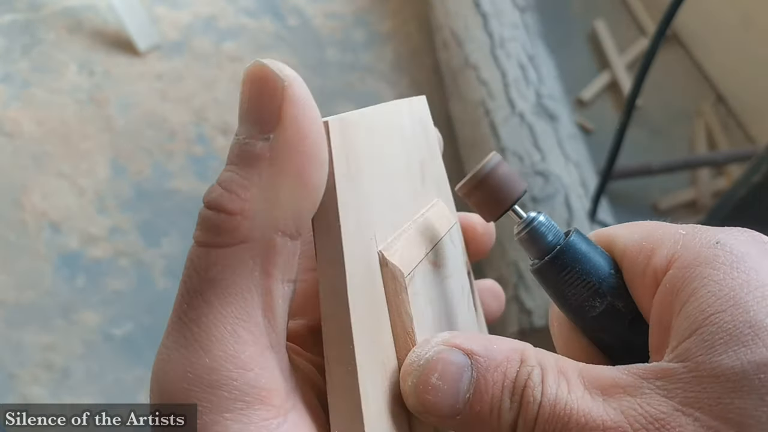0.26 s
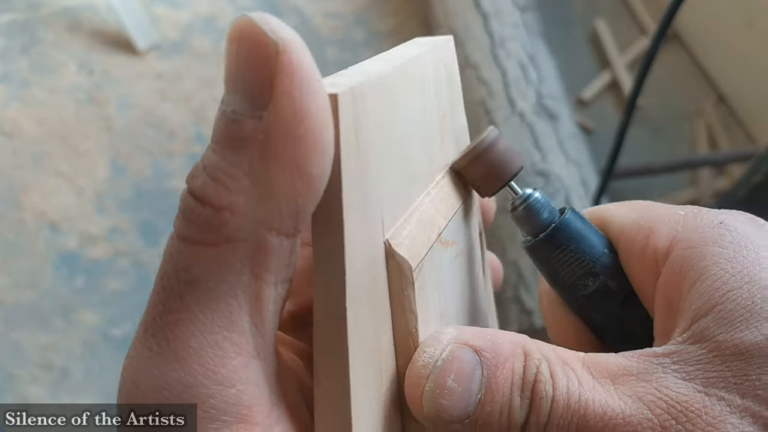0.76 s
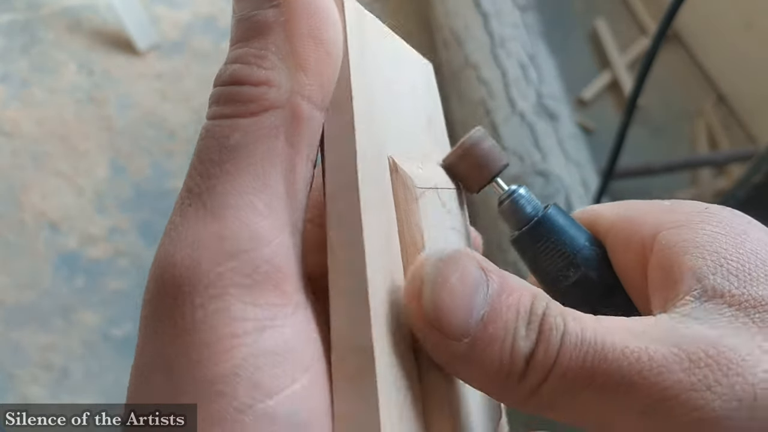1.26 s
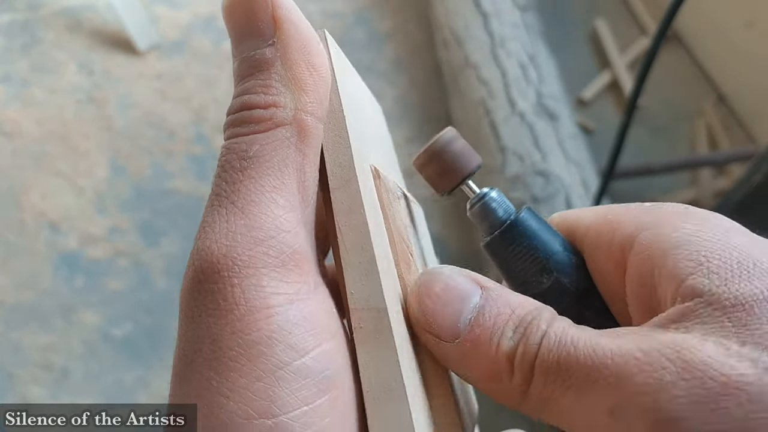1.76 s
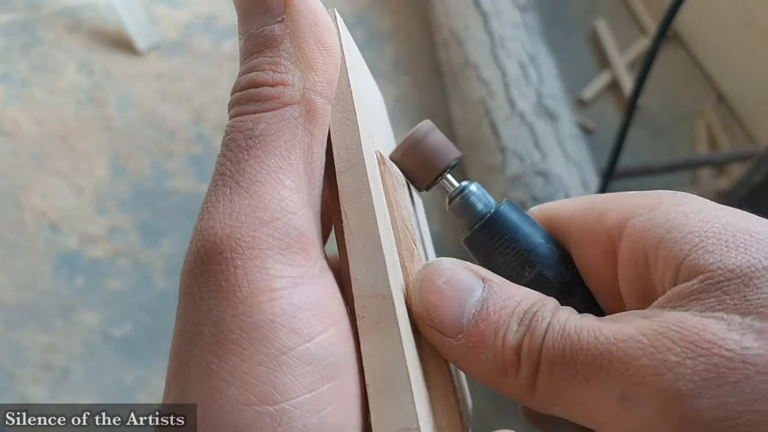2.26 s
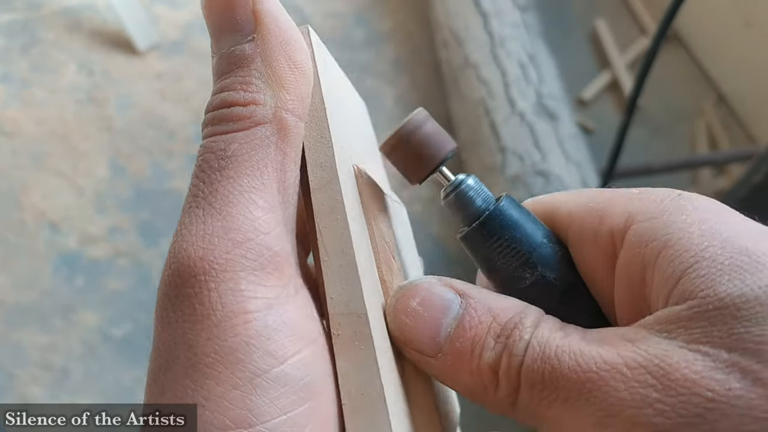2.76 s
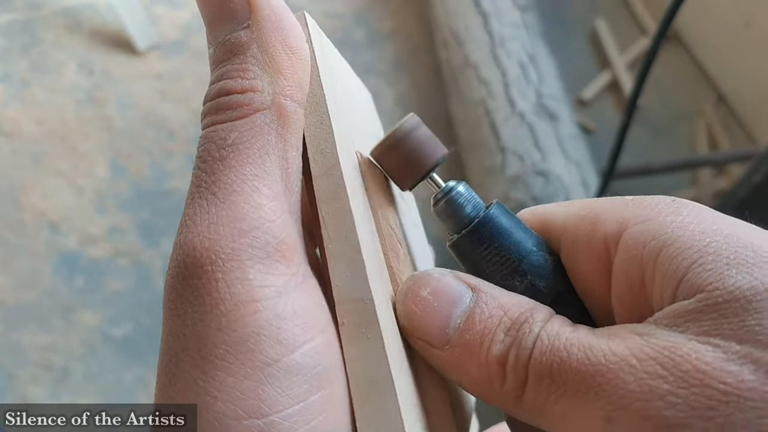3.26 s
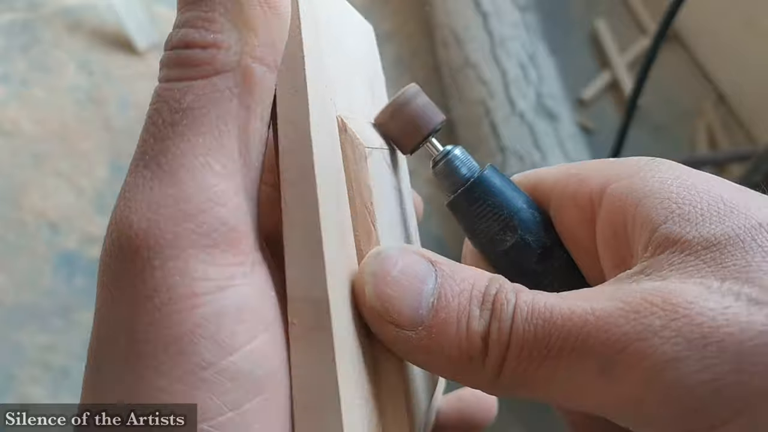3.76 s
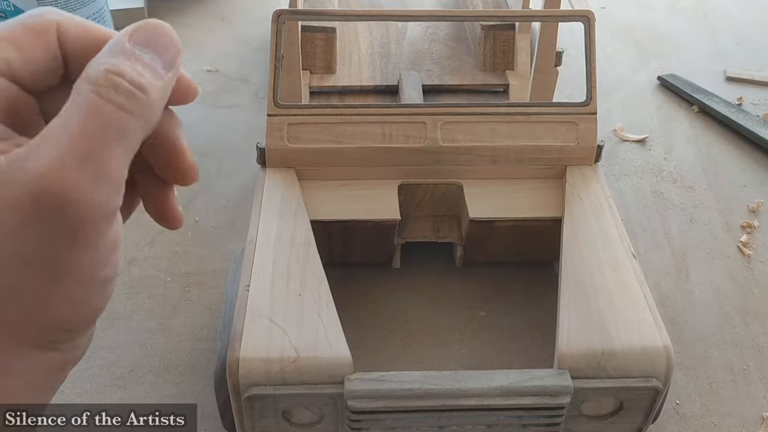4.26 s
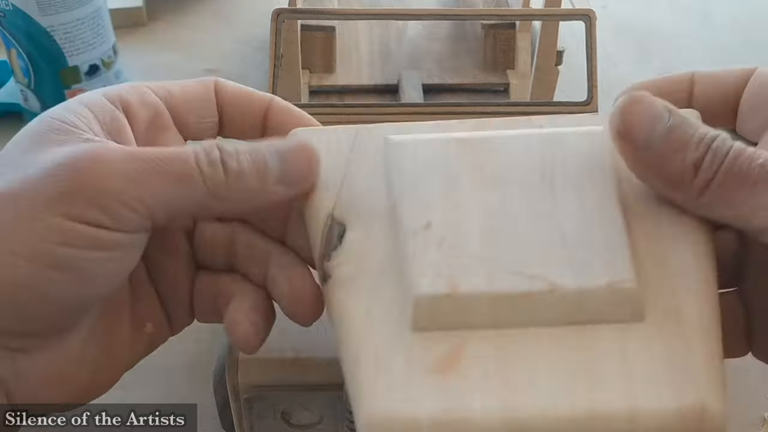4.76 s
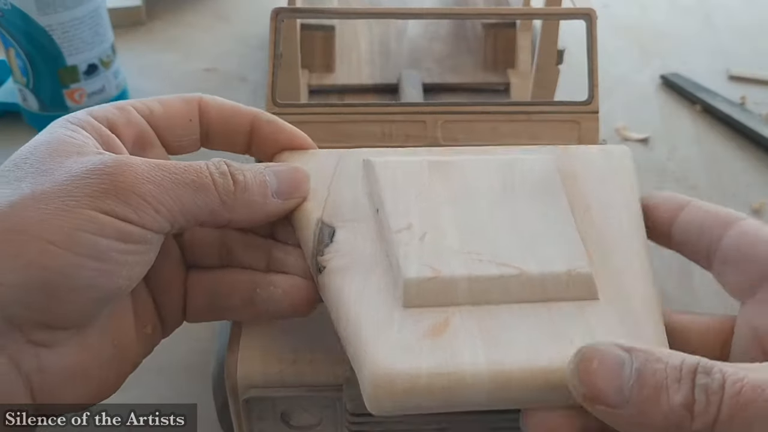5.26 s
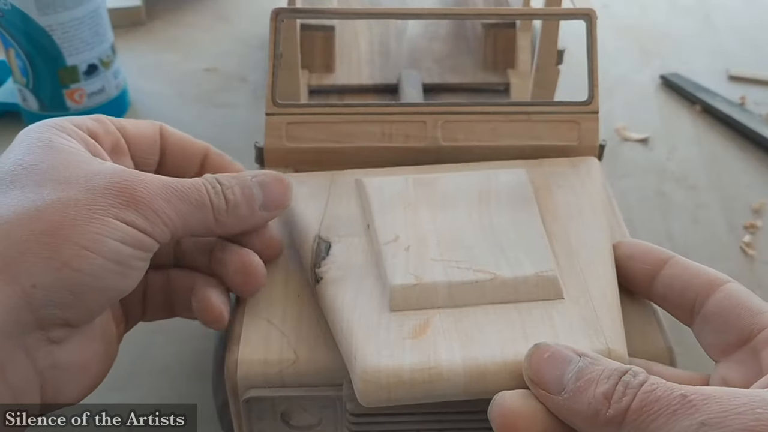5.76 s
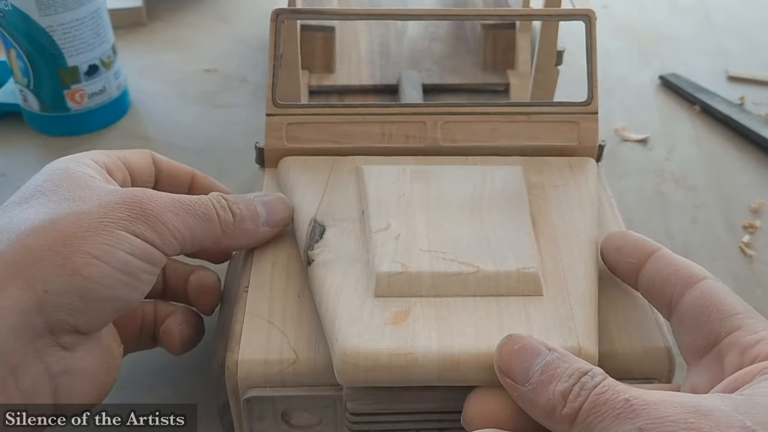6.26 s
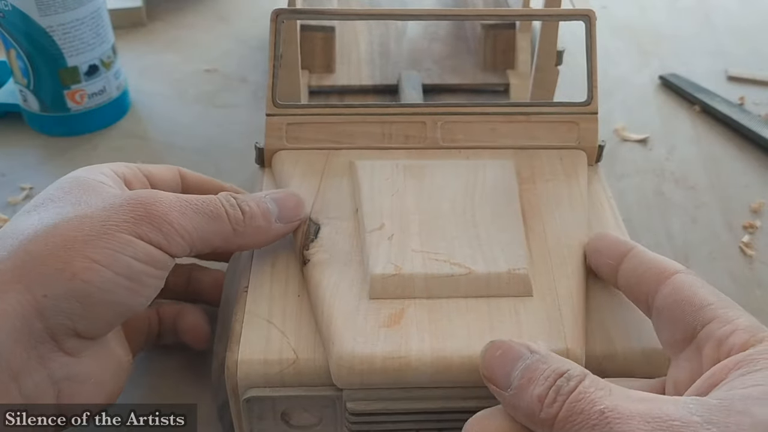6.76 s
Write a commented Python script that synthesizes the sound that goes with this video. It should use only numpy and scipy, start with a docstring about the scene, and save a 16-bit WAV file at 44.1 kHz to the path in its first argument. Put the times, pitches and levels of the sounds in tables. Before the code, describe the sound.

From 0 to about 4.04 s a handheld rotary sanding drum runs very close: a buzzing tone wavering around 1.0-1.2 kHz, dense shrill whine and bright hiss mostly at 6-12 kHz. Pitch rises at first, sags as the drum presses wood, and recovers; short rasps bite near 0.9 and 2.1 s. Light wooden knocks come at 0.76 s and in a small cluster around 1.8 s. The tool stops dead, with no wind-down. From 4 to 5.7 s it is almost quiet: faint skin and cloth rustles, dry tiny squeaks, a few sharp ticks near 5.25 s. At 5.74 s a wooden lid knocks onto a hollow wooden toy, with lighter taps at 5.9 and 6.3 s and low scrapes. The strongest clattering knock cluster lands at 6.65 s, with a low bench boom and short room tail. Soft low workshop air runs throughout.

```python
"""From the start a hand-held sanding drum whines on a wooden board close to a camera: buzzing tones and hissing noise.
A few wooden knocks, each a bundle of dying notes, join the whine before its sound is cut off abruptly at about 4 s.
Then hands shift a wooden lid: shaped noise makes the rustle and scrape, narrow notes the squeaks and ticks.
From 5.7 s the lid is set down on a hollow wooden toy with knocks, a bench boom and a room tail.
Under it all lies the soft noise of the workshop air and the microphone."""
import sys
import numpy as np
from scipy import signal
from scipy.fft import rfft, irfft, next_fast_len
from scipy.io import wavfile
from scipy.ndimage import uniform_filter1d, map_coordinates

SR = 44100
rng = np.random.default_rng(int(sys.argv[2]) if len(sys.argv) > 2 else 0)


def unload_wav(signal):
    """Save mono or channel-first audio to the path in sys.argv[1] as 16-bit WAV at rate SR, clipped to [-1, 1]."""
    wavfile.write(
        sys.argv[1],
        SR,
        np.round(np.clip(np.atleast_2d(signal).T, -1, 1) * 32767).astype(np.int16),
    )


N = 308700
NOW = np.arange(N) / SR  # time of each sample, s
SIDES = np.array([[.5], [-.5]])  # shares a left-minus-right difference between the two channels
BARS = 10  # commutator bars: pulses per shaft turn
BLUR = .008  # radians of quick phase scatter per multiple of shaft speed

# How alike the tool's noise is on the left and right: f/Hz, likeness (1 = the same)
TOOL_LIKENESS = [(300, .7), (1100, .95), (2100, .3), (3700, .5), (5000, .2), (6800, .75), (10000, .75),
                 (12000, .5), (12800, .8), (15000, .2)]


def amp(db):
    """Turn a level in dB into a gain."""
    return 10 ** (np.asarray(db) / 20)


def unit(x):
    """Scale x to an average strength (rms) of 1."""
    return x / np.sqrt(np.mean(x ** 2) + 1e-20)


def along(points, hz):
    """Read a curve of (Hz, value) points on a log pitch axis."""
    f, v = np.transpose(points)
    return np.interp(np.log(hz + 1), np.log(f + 1), v)


def colour(spectrum):
    """Make a gain curve out of (Hz, dB) points."""
    return lambda hz: amp(along(spectrum, hz))


def curves(rows):
    """Draw a line through each column after the time, one value per sample."""
    s, *columns = np.transpose(rows)
    return [np.interp(NOW, s, column) for column in columns]


def wobble(rate):
    """A random curve of straight pieces, with this many random points a second."""
    points = rng.standard_normal(int(N * rate / SR) + 4)
    return map_coordinates(points, [np.arange(N) * rate / SR], order=1)


def fuzz(phase, width_hz):
    """A fuzzy stereo note: narrow noise around a running phase, half alike in the two channels."""
    apart = np.array([wobble(width_hz), wobble(width_hz)])
    return wobble(width_hz) * np.cos(phase) + apart * np.sin(phase)


def filtered(x, response):
    """Change the strength and phase of each pitch in x."""
    m = next_fast_len(N + SR // 2)
    return irfft(rfft(x, m) * response(np.fft.rfftfreq(m, 1 / SR)), m)[..., :N]


def rush(gain, alike, patchy_db):
    """Stereo noise of rms 1, randomly stronger and weaker in patches of time and pitch."""
    z = signal.stft(rng.standard_normal((2, N)), nperseg=512)[2]
    patches = uniform_filter1d(rng.standard_normal(z.shape[1:]), size=6, axis=0)
    patches = uniform_filter1d(patches, size=10, axis=1)
    pair = signal.istft(z * amp(patchy_db * unit(patches)), nperseg=512)[1][:, :N]

    def middle_and_side(hz):
        angle = np.arccos(np.clip(along(alike, hz), -1, 1)) / 2
        return gain(hz) * [np.cos(angle), np.sin(angle)]

    mid, side = filtered(pair, middle_and_side)
    return unit(np.array([mid + side, mid - side]))


def tool():
    """The commutator pulses ten times a turn; its buzz, whine and hiss follow the speed and load of the drum."""
    # Speed, sagging whenever the drum is pressed on: t/s, commutator rate f/Hz
    speed = [(0, 1012), (.14, 1082), (.3, 1126), (.53, 1155), (.66, 1182), (.77, 1190), (.89, 1139),
             (1.025, 1086), (1.14, 1123), (1.31, 1162), (1.45, 1135), (1.56, 1125), (1.67, 1094),
             (1.83, 1138), (1.96, 1150), (2.12, 1095), (2.23, 1088), (2.47, 1028), (2.66, 1057),
             (2.75, 1060), (2.95, 1092), (3.16, 1066), (3.32, 1114), (3.45, 1131), (3.66, 1137),
             (3.81, 1101), (3.91, 1102), (4.04, 1090)]
    # Loudness: t/s, first tone level/dB, second tone level/dB, treble level/dB
    levels = [(0, -60, -66.0, -31), (0.06, -48, -71, -31), (0.13, -36, -52, -29), (0.25, -40, -62, -30),
              (0.36, -54, -49, -29), (0.45, -56, -40, -28.5), (0.58, -46.5, -44.5, -27.5),
              (0.71, -42, -58, -28), (0.83, -38.5, -41, -24.5), (0.93, -48.5, -48.5, -27),
              (1.03, -38, -54, -30.5), (1.14, -60, -62, -29), (1.25, -50, -42, -30.5),
              (1.36, -43.5, -42, -27.5), (1.5, -48.5, -55, -29.5), (1.58, -47, -48, -30.5),
              (1.66, -35, -48, -29.5), (1.76, -51.5, -56, -30), (1.88, -57.5, -43, -29.5),
              (2, -48.5, -46, -30.5), (2.12, -38, -50, -28.5), (2.25, -31.5, -57, -27),
              (2.4, -42.5, -46.5, -30), (2.55, -45.5, -56.5, -29.5), (2.67, -39.5, -60, -31),
              (2.8, -40, -53, -30), (2.92, -39, -51.5, -30), (3.03, -32.5, -55, -31),
              (3.18, -38.0, -52, -31.5), (3.32, -40.5, -48, -29), (3.45, -52.5, -52, -28.5),
              (3.58, -46, -54, -28.5), (3.7, -45.5, -50, -27.5), (3.82, -39.5, -50, -29.5),
              (3.93, -38.5, -58, -28.5), (4.04, -37.5, -58.5, -30.5)]
    # Cutting: t/s, board overtones level/dB, tilt of the whine/dB per octave
    cutting = [(0, -64, 0.5), (.2, -75, -4), (.6, -54, -18), (.78, -56, -7), (.92, -45, -10),
               (1.1, -53, -0.5), (1.35, -57, 4.5), (1.5, -47, 5), (1.7, -56, 12), (1.9, -52.5, 1.5),
               (2.1, -45.5, -12), (2.32, -47, 0.5), (2.5, -49.5, 13), (2.7, -74, 14.5), (2.95, -58, 10),
               (3.1, -51, 11), (3.25, -61, 6), (3.5, -62, -2), (3.75, -49, -0.5), (4.04, -54, -1)]
    # How clearly the whine stands out of the hiss: t/s, change of its share level/dB
    clear = [(0, 1.5), (.8, 1.5), (1.1, -2.5), (2, -2.5), (2.8, -2), (3.3, 0), (4.04, -1)]
    # Loudness balance: f/Hz, left minus right level/dB
    pan = [(200, -1), (950, 0), (2400, 2), (4400, -2), (6500, 2.5), (8000, -1), (10500, -4), (12000, .5),
           (15000, 2)]
    # Time balance: f/Hz, phase by which the left leads/radians
    lead = [(0, 0), (1500, 0), (2300, 2), (3700, 3.1), (4800, 5.5), (5500, 6.6), (7500, 5.6), (9000, 6.3),
            (11500, 6.8), (12500, 6.3), (16000, 6.6)]
    inertia_s, loaded_hz, free_hz = .25, 1090, 1170  # rotor lag; rates it heads for pressed hard, running free
    loaded_share, free_share = .1, .52  # whine in the treble, before the changes in clear
    cut_s, cut_fade_s, grit_db = 4.042, 0.00075, -43.5  # the tool's sound is cut off abruptly

    first_db, second_db, treble_db = curves(levels)
    cutting_db, tilt_db = curves(cutting)
    bar_hz = uniform_filter1d(curves(speed)[0], size=2200)  # the rotor rounds every change of speed
    heading_hz = uniform_filter1d(bar_hz + inertia_s * np.gradient(bar_hz) * SR, size=4000)
    free = np.clip((heading_hz - loaded_hz) / (free_hz - loaded_hz), 0, 1)
    # a free drum whines, a loaded one hisses
    share = np.interp(free, [0, 1], [loaded_share, free_share]) * amp(curves(clear)[0])
    turn = 2 * np.pi * np.cumsum(bar_hz) / SR
    # under load the pulses come unevenly, which blurs the high multiples
    uneven = turn + 0.091 * (.8 - share) * wobble(150)

    tones = buzz(turn, first_db, second_db) + board_hum()
    whine_part = np.sqrt(share) * whine(bar_hz, uneven, tilt_db)
    hiss_part = np.sqrt(1 - share) * 0.87 * hiss(uneven)
    treble = amp(treble_db) * (whine_part + hiss_part + hiss_humps(turn) * np.sqrt(share) * 0.87)
    sound = tones + treble + amp(grit_db) * grit() + squeal(uneven)

    def left_and_right(hz):
        return amp(along(pan, hz) * SIDES) * np.exp(1j * np.interp(hz, *np.transpose(lead)) * SIDES)

    board = board_overtones(uneven, cutting_db) + skips(turn, uneven)
    return (filtered(sound, left_and_right) + board) * np.clip((cut_s - NOW) / cut_fade_s, 0, 1)


def buzz(turn, first_db, second_db):
    """One pulse per commutator bar gives the first tone; the second is twice as high."""
    flutter_db = np.clip(-.5 * (first_db + 36), .7, 5) * wobble(75)  # a weaker tone flutters more
    slant = .25 * wobble(5.5)
    first = amp(first_db + flutter_db) * np.sin(turn + 0.27 * wobble(44))
    second = amp(second_db + 3.5 * wobble(70)) * np.sin(2 * turn + [slant + 0.037, -slant - .1])
    return np.sqrt(2) * (first + second)


def board_hum():
    """The board under the drum hums fuzzy notes of its own, with which the first tone beats."""
    # Board notes: f/Hz, width/Hz, level/dB
    notes = [(1082, 50, -53), (1180, 60, -63)]
    out = np.zeros(N)
    for hz, width_hz, db in notes:
        out += amp(db + 0.81 * wobble(3.6)) * fuzz(2 * np.pi * hz * NOW, width_hz).mean(axis=0)
    return out


def whine(bar_hz, uneven, tilt_db):
    """Unequal commutator bars add lines at multiples of the shaft speed, nearly all whole."""
    # Whine lines: multiple of shaft speed, relative level/dB
    lines = [(25.5, -24.5), (30, -21.5), (40, -11.5), (50, -12.5), (57, -15), (59, -5), (60, -10),
             (61, -18), (68, -9), (69, -13), (70, -4), (71, -10), (77, -1.5), (78, -13), (79, -7.5),
             (80, -5.5), (81, -9.5), (87, -11), (89, 1.5), (90, -3), (91, -7.5), (98, -4.5), (99, -2),
             (100, -9.5), (109, -14.5), (110, -18.5), (119, -18.5), (120, -19.5), (129, -17.5)]
    tilt_hz = 8800  # the tilt turns about this pitch
    out = np.zeros((2, N))
    for order, db in lines:
        # each line swells and fades as the tool moves among the reflections
        fade_db = 3 * wobble(9)
        if order > 55:
            fade_db += tilt_db * np.log2(order / BARS * bar_hz / tilt_hz)
        slant = 0.67 * wobble(5)  # it reaches the two channels at a shifting angle
        phase = order / BARS * uneven + 2.16 * wobble(3) + BLUR * order * wobble(160)
        out += amp(db + fade_db) * np.cos(phase + [slant, -slant])
    return unit(out * amp(0.38 * wobble(800)))  # quick random changes: pulses differ in strength


def hiss(uneven):
    """Abrasive and cooling air hiss, puffing at each bar and once a turn."""
    # Hiss colour: f/Hz, relative level/dB per Hz
    spectrum = [(3000, -51.5), (4200, -17.5), (5500, -14.5), (7000, -12.5), (8000, -7.5), (10000, -4.5),
                (11500, -5), (13500, -10.5), (15700, -11.5)]
    shaft_puff, sharp_puff = 0.055, .25  # depth once a turn, and twice a bar
    puff = 1 + 0.28 * np.cos(uneven) + sharp_puff * np.cos(2 * uneven)
    puff = puff * (1 + shaft_puff * np.cos(uneven / BARS)) * amp(1.0 * wobble(900))
    return unit(puff * rush(colour(spectrum), TOOL_LIKENESS, patchy_db=2.5))


def hiss_humps(turn):
    """The hiss half repeats from bar to bar, so it bunches into wide humps that follow the speed."""
    # Humps: multiple of shaft speed, level/dB (before the treble mix scales it)
    humps = [(59, -16), (69.5, -9), (79, -7), (89, -4), (99, -6), (109, -10), (119.5, -12), (129, -12),
             (138.5, -14)]
    width_hz = 650
    return sum(amp(db + 2.84 * wobble(3.01)) * fuzz(k / BARS * turn, width_hz) for k, db in humps)


def grit():
    """The board under the drum gives a steady coloured noise."""
    # Grit colour: f/Hz, relative level/dB per Hz
    spectrum = [(150, -37), (280, -29), (450, -15), (650, -13), (900, 0.5), (1150, -13), (1500, -3),
                (2500, -2), (3300, -1), (3800, -6.5), (4400, -0.5), (5200, -3), (6500, -41.5)]
    return rush(colour(spectrum), TOOL_LIKENESS, patchy_db=2.5)


def squeal(uneven):
    """The drum digs in and rasps: noise rings in two bands and catches at every pulse."""
    # Bands: f/Hz, width/Hz, level/dB (width and level before the sum is squared)
    bands = [(7100, 640, -19.5), (7300, 3100, -13)]
    # Bites: middle t/s, level/dB, time to fall by 20 dB/s
    bites = [(0.872, -36.5, 0.064), (2.097, -25.5, 0.048), (2.162, -33, 0.031)]

    def ring(f):
        both = sum(amp(db) * 1j * f * w / (c * c - f * f + 1j * f * w) for c, w, db in bands)
        return np.abs(both) ** 2

    out = np.zeros((2, N))
    for s, db, half in bites:
        out += amp(db - 20 * ((NOW - s) / half) ** 2) * rush(ring, TOOL_LIKENESS, patchy_db=1.5)
    # strongest at the drum's high spot
    return out * unit(amp(2 * np.cos(uneven / BARS) + 4 * np.cos(uneven) + 1.5 * wobble(400)))


def board_overtones(uneven, cutting_db):
    """While the drum cuts, the board adds higher notes of the turning shaft."""
    # Overtones: multiple of shaft speed, level/dB on top of the cutting level
    overtones = [(30, -3), (40, -1), (50, -1), (60, 0), (70, 3), (80, 3), (100, 2)]
    out = np.zeros((2, N))
    for k, db in overtones:
        phase = k / BARS * uneven + 2.5 * BLUR * k * wobble(150)
        level_db = cutting_db + db + 3 * wobble(6) + 2.5 * wobble(120)
        out += amp(level_db) * np.sin(phase + [[.4], [-.4]] * wobble(6))
    return out


def skips(turn, uneven):
    """The drum catches on every other bar: a half-rate hum and its overtones, alike on both sides."""
    # Skip overtones: multiple of shaft speed, relative level/dB
    overtones = [(25, 0), (35, -4), (45, -6), (55, -1), (65, -5)]
    # Skips: middle t/s, hum level/dB, overtones level/dB, time to fall by 10 dB/s
    moments = [(.4, -64, -68, .08), (1.17, -63, -68, .13), (2.0, -66, -68, .06), (2.1, -68, -50, .06),
               (3.08, -66, -48, .14), (3.6, -67, -68, .06), (3.85, -66, -56, .14)]
    hum_gain, overtone_gain = np.zeros((2, N))
    for s, hum_db, overtone_db, half in moments:
        fall_db = 10 * ((NOW - s) / half) ** 4
        hum_gain += amp(hum_db - fall_db)
        overtone_gain += amp(overtone_db - fall_db)
    out = hum_gain * amp(4 * wobble(25)) * np.sin(turn / 2)
    for k, db in overtones:
        line = np.sin(k / BARS * uneven + BLUR * k * wobble(150))
        out += overtone_gain * amp(db + 3 * wobble(40)) * line
    return out


def knocks():
    """Each blow rattles the wood notes near its own pitch and fills the room; on the toy it also booms the bench."""
    # Blows on wood: t/s, level/dB, strongest pitch f/Hz, spread/octaves
    blows = [(0.757, -27.5, 1440, 0.15), (0.766, -29.5, 1440, 0.2), (1.759, -35.5, 805, 0.57),
             (1.795, -29, 860, 0.92), (1.811, -35, 644, 0.23), (1.821, -30, 700, 1.1),
             (1.832, -33, 520, 0.21), (1.886, -38.5, 710, 0.27), (4.795, -51, 1610, 1.3),
             (5.056, -60, 490, 0.48), (5.393, -51.5, 700, 1.5), (5.417, -56, 656, .8),
             (5.430, -44.5, 513, 0.49), (5.7346, -20, 1980, 0.46), (5.7365, -17, 547, 0.97),
             (5.7395, -20.5, 477, .6), (5.745, -25.5, 747, 1), (5.754, -21, 560, 0.71),
             (5.821, -33, 600, 0.53), (5.9116, -24.5, 860, 0.27), (5.916, -29.5, 343, 0.62),
             (6.066, -48.5, 2040, 0.25), (6.319, -34.5, 325, 0.88), (6.323, -42, 900, 0.91),
             (6.631, -25.5, 305, 0.7), (6.641, -20, 704, 0.56), (6.6444, -16.5, 900, 0.48),
             (6.647, -15, 1270, 0.87), (6.6506, -11, 880, 0.6), (6.658, -20.5, 886, 1.2),
             (6.665, -22, 990, .6)]
    set_down_s = 5.6  # before, the wood is held in the hands; after, it lies on the toy
    held_room_db, toy_room_db = -18, -4.5  # how much of a blow reaches the room
    out, boom = np.zeros((2, N + 3 * SR)), bench_boom()
    for s, db, pitch_hz, octaves in blows:
        on_toy = s > set_down_s
        room_db = toy_room_db if on_toy else held_room_db
        blow = wood_blow(db, pitch_hz, octaves)
        echo, at = shop(blow), round(s * SR)
        out[:, at:at + len(blow)] += amp(db) * blow
        if on_toy:
            out[:, at:at + SR] += amp(db + room_db + 10.0) * boom
        out[:, at + 300:][:, :echo.shape[1]] += amp(db + room_db) * echo

    def small_wood(f):
        return (1j * f / (70 + 1j * f)) ** 2 / np.sqrt(1 + (f / 10000) ** 12)

    return filtered(out[:, :N], small_wood)  # small, soft wood: no deep bass, no sizzle


def wood_blow(db, pitch_hz, octaves):
    """A blow sets off dying wood notes, loudest near its pitch, and a short crack of dull noise."""
    # Wood notes: f/Hz, relative level/dB, share of the blow's ring time
    wood = [(317, -2.5, 1.45), (434, -3.5, 1.25), (644.5, 2, 0.91), (878, 4, 0.88), (1093, -2, 1.6),
            (1443, 0, 0.9), (1592, -4, 0.8), (1787, 3, 0.69), (2257, -2.5, 1.75), (2570, -1, 0.48),
            (3130, -8.5, 0.292), (3630, 6.5, 0.35), (4340, -3, .5), (4910, 2, 0.58)]
    t60 = 0.039 * (700 / pitch_hz) ** 0.39  # s to fall by 60 dB; higher blows are shorter
    rise = 0.83 / pitch_hz  # s
    t = np.arange(SR // 5) / SR
    hz, mode_db, life = np.transpose(wood)[:, :, None]
    level_db = mode_db - 9 * np.abs(np.log2(hz / pitch_hz)) / octaves + rng.normal(0, 1, hz.shape)
    # loose parts keep the ring from being pure
    rattle = np.cumsum(0.1 * np.sqrt(hz / 800) * rng.standard_normal((len(hz), len(t))), axis=1)
    rattle = uniform_filter1d(rattle + rng.uniform(0, 2 * np.pi, hz.shape), size=16, axis=1)
    modes = amp(level_db - 60 * t / (t60 * life)) * np.sin(2 * np.pi * hz * t + rattle)
    blow = modes.sum(axis=0) * (1 - np.exp(-(t / rise) ** 2))
    dull = uniform_filter1d(uniform_filter1d(rng.standard_normal(len(t)), size=4), size=5)
    # harder, broader blows crack more
    crack = octaves ** 2 * amp(12.5 + 0.52 * db - 60 * t / (.5 * t60)) * (1 - np.exp(-t / rise)) * dull
    return blow / np.abs(blow).max() + crack


def bench_boom():
    """The bench booms on in two low notes that swell up and die away."""
    # Bench notes: f/Hz, relative level/dB, time to fall by 60 dB/s
    bench = [(118.5, -36.5, 1.2), (222.3, -19, 0.15)]
    t = np.arange(SR) / SR
    boom = sum(amp(db - 60 * t / t60) * np.sin(2 * np.pi * hz * t) for hz, db, t60 in bench)
    return boom * (1 - np.exp(-t / 0.044)) * (1 + 0.42 * np.sin(2 * np.pi * 25 * t))  # neighbouring modes beat


def shop(x):
    """A fresh room tail: each pitch dies at its own speed; the bass is the most alike on both sides."""
    # Room: f/Hz, time to fall by 60 dB/s, relative level/dB
    room = np.array([(148, 0.7, 4), (404, 0.82, -1.5), (908, 0.53, -5), (2530, 0.54, -5), (10000, 0.46, -3)])
    hz, t, z = signal.stft(rng.standard_normal((2, SR)), SR, nperseg=256)
    apart = along([(200, 0.35), (1500, 1.0)], hz)[:, None]
    fall_db = along(room[:, ::2], hz)[:, None] - 60 * t / along(room[:, :2], hz)[:, None]
    pair = z[0] + apart * z[1] * [[[1]], [[-1]]]
    tail = signal.istft(pair * amp(fall_db), SR, nperseg=256)[1]
    tail = tail / np.sqrt(256 * np.mean(tail[0, :256] ** 2) * 8)
    return signal.fftconvolve(x[None], tail, axes=1)


def hands():
    """Hands on the lid: rubbing skin and cloth, the scraping lid, dry squeaks and small hard ticks."""
    return strokes() + slides() + squeaks() + ticks()


def strokes():
    """Skin and cloth rub stroke by stroke: lumpy noise in a lower rub and a finer rustle."""
    # Strokes: start t/s, length/s, rub level/dB, rustle level/dB, left minus right level/dB
    moves = [(4.01, 0.048, -63, -60, 6), (4.1, 0.036, -71, -65, 8), (4.122, 0.11, -68, -61, 7),
             (4.262, 0.04, -75, -63, 6), (4.348, 0.096, -62, -58.5, 4), (4.505, 0.12, -73, -70.5, 0),
             (4.775, 0.09, -68.5, -65, 0), (4.929, 0.023, -66, -60, -2), (4.997, 0.07, -76, -71, -1),
             (5.07, 0.052, -73.5, -68, -1.5), (5.163, 0.12, -67, -57.5, -1), (5.3, 0.12, -68.5, -66.5, -2),
             (5.435, 0.12, -73.5, -68, -1), (5.608, 0.2, -68, -61.5, -1), (6.026, 0.08, -64, -60.5, -2),
             (6.116, 0.059, -60, -62, 0), (6.245, 0.11, -64, -66, -2), (6.5, 0.028, -63, -60.5, -4),
             (6.604, 0.056, -55.5, -57, -2), (6.63, 0.079, -56, -53.5, 0), (6.73, 0.25, -69.5, -73.5, -1)]
    # Rub colour: f/Hz, relative level/dB per Hz
    rub_colour = [(710, -44), (1200, -27), (1680, -8), (2020, -20), (3230, -5.5), (4520, -8), (6000, -11.5),
                  (7800, -34), (13200, -120)]
    # Rustle colour: f/Hz, relative level/dB per Hz
    rustle_colour = [(2940, -50), (4500, -22), (6000, -7.5), (7500, -2.5), (8600, 3), (9600, 0.5),
                     (10800, -10), (12100, -18), (13300, -15.5), (15500, -29)]
    grip_s, let_go_s = 0.035, 0.08  # a stroke takes this long to rise, and to fall, by 20 dB
    rub, rustle = np.zeros((2, 2, N))
    for s, length, rub_db, rustle_db, pan_db in moves:
        outside = np.maximum((s + grip_s - NOW) / grip_s, (NOW - s - length) / let_go_s)
        shape_db = -20 * np.maximum(0, outside) + pan_db * SIDES
        rub += amp(rub_db + shape_db)
        rustle += amp(rustle_db + shape_db)
    lumps = amp(2.05 * wobble(70) + 1.5 * wobble(14) + 1.8 * wobble(300))
    out = rub * lumps * rush(colour(rub_colour), [(3000, 0.063)], patchy_db=3)
    return out + rustle * lumps * rush(colour(rustle_colour), [(8000, 0.066)], patchy_db=3)


def slides():
    """The lid scrapes into place: low rough noise that rises fast and falls slowly."""
    # Slides: loudest t/s, level/dB
    moments = [(5.908, -48.5), (6.63, -46.5), (6.76, -70)]
    # Scrape colour: f/Hz, relative level/dB per Hz
    spectrum = [(59, -37), (100, -2), (240, 3.5), (286, -2.5), (910, -5), (1010, -9), (2500, -20.5),
                (3250, -42), (5500, -120)]
    rise_db, fall_db = 189, 28  # per second
    gain = sum(amp(db - np.maximum(rise_db * (s - NOW), fall_db * (NOW - s))) for s, db in moments)
    noise = rush(colour(spectrum), [(200, 0.95), (1500, 0.22)], patchy_db=2)
    return gain * amp(1.9 * wobble(40)) * noise


def squeaks():
    """A fingertip drags on the wood with a dry, fuzzy note."""
    # Squeaks: middle t/s, level/dB, time to fall by 10 dB/s, f/Hz, width/Hz
    drags = [(4.17, -66, .04, 8350, 250), (4.235, -68, .03, 7320, 150), (4.3, -65, .025, 8350, 250),
             (4.4, -67, 0.033, 1650, 150), (4.405, -64, .04, 3250, 120), (4.46, -66, .035, 4040, 100),
             (4.793, -71, 0.018, 1640, 150), (5.283, -65, 0.044, 3750, 300), (5.66, -68, .04, 1040, 500)]
    out = np.zeros((2, N))
    for s, db, half, hz, width_hz in drags:
        out += amp(db - 10 * ((NOW - s) / half) ** 4) * fuzz(2 * np.pi * hz * NOW, width_hz)
    return out


def ticks():
    """Small hard ticks on the lid: tiny high notes, roughened and gone in a few milliseconds."""
    # Ticks, a row for each pitch: t/s, level/dB (before a lift of 1.5 dB), f/Hz, left minus right level/dB
    taps = [(4.775, -53, 2840, 1), (4.796, -41.5, 8440, -3.5), (5.218, -42, 9700, -12),
            (5.218, -35, 12800, -8), (5.255, -27.5, 4240, -8), (5.256, -33.5, 7600, -12),
            (6.656, -25, 9050, -6), (6.657, -25, 6850, 0)]
    out, t = np.zeros((2, N)), np.arange(600) / SR
    for s, db, hz, pan_db in taps:
        rough = np.cumsum(rng.normal(0, 0.15, (2, len(t))), axis=1)
        tick = np.sin(2 * np.pi * hz * t + rough) * (1 - np.exp(-t / .0003))
        out[:, round(s * SR):][:, :len(t)] += amp(db + 1.5 - 60 * t / 0.006 + pan_db * SIDES) * tick
    return out


def floor_noise():
    """Workshop air and microphone noise: a soft, steady, mostly low rush."""
    # Floor colour: f/Hz, relative level/dB per Hz
    spectrum = [(15, -4.5), (25, -3), (100, -17), (160, -14.5), (300, -23), (1000, -32.5), (4000, -38),
                (9000, -32.5), (11500, -41.5), (15700, -79.5)]
    alike = [(30, 0.088), (70, 0.16), (150, 0.11), (500, 0.26), (2000, 0.083)]  # (Hz, likeness)
    air = rush(colour(spectrum), alike, patchy_db=0.0)
    lean = [(30, -1.0), (80, -0.47)]  # (Hz, dB added on the left and taken from the right)
    return amp(-62.5) * filtered(air, lambda hz: amp(along(lean, hz) * [[1], [-1]]))


def scene():
    """Tool, knocks and hands over the workshop's floor noise."""
    return tool() + knocks() + hands() + floor_noise()


def record(dry):
    """The camera keeps nothing above its band limit."""
    top_hz = 15750  # middle of a narrow fade-out in pitch
    return filtered(dry, lambda hz: np.sin(np.pi / 4 * np.clip(1 + (top_hz - hz) / 60, 0, 2)) ** 2)


dry = scene()
out = record(dry)
unload_wav(out)
```